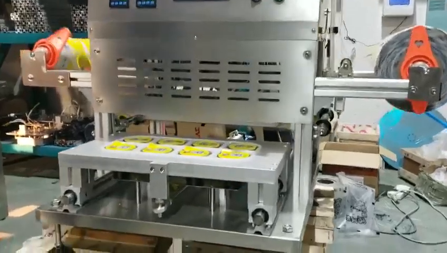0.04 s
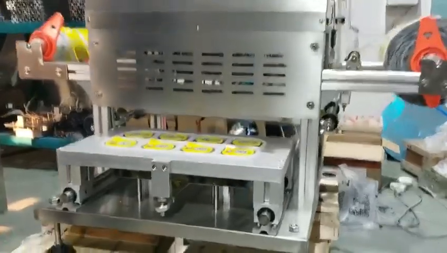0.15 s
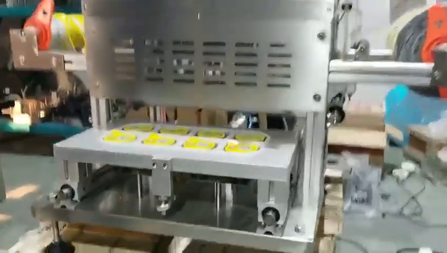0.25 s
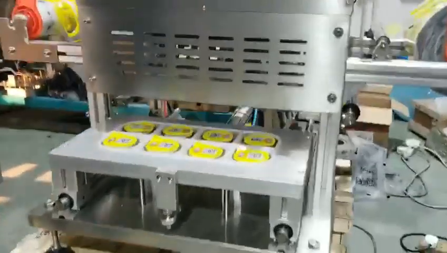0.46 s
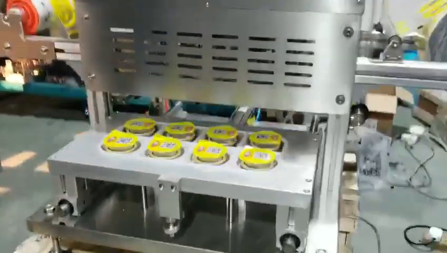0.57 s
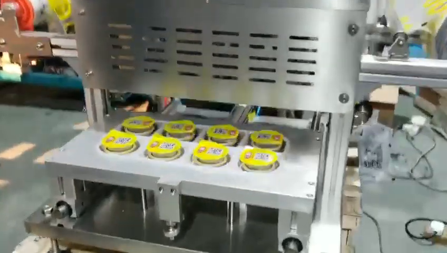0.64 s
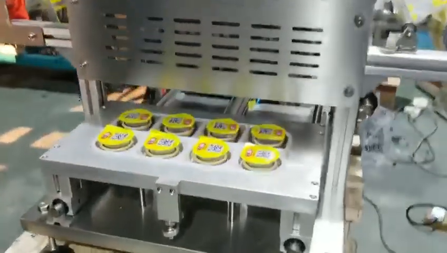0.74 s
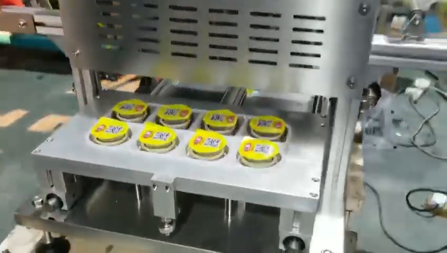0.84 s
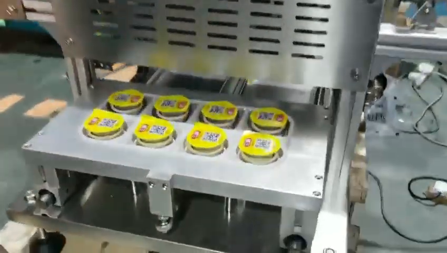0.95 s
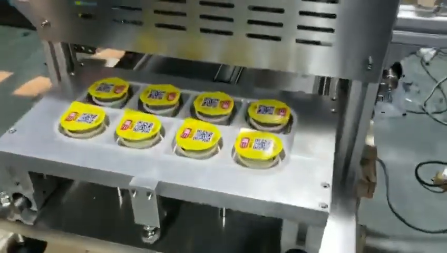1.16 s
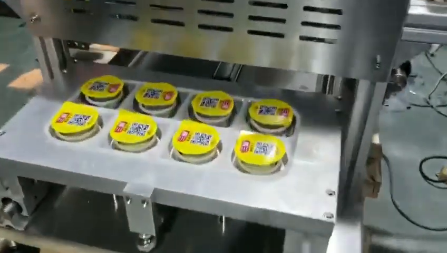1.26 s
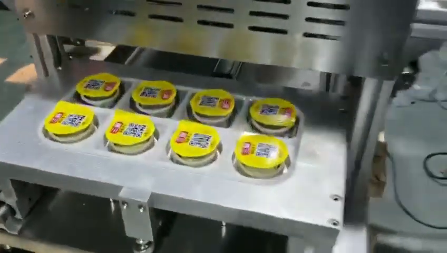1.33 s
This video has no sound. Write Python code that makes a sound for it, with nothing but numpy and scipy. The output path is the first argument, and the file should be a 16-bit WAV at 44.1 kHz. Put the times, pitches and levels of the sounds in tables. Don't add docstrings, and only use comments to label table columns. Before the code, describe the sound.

Close phone pickup of a metal machine tray: soft pneumatic thump, short rubbing slide, hard clank and rapid ringing rattle, then low frame boom, tiny ticks and faint distant machinery in a live workshop.

```python
import sys
import numpy as np
from scipy import signal
from scipy.fft import rfft, irfft, next_fast_len
from scipy.io import wavfile
from scipy.ndimage import uniform_filter1d

SR = 44100
rng = np.random.default_rng(int(sys.argv[2]) if len(sys.argv) > 2 else 0)


def store_pcm(level_fs):
    pcm = np.round(np.clip(level_fs, -1, 1) * 32767).astype(np.int16)
    wavfile.write(sys.argv[1], SR, np.atleast_2d(pcm).T)


def invert_db(x):
    u = np.asarray(x, float) / 20
    return 10 ** u


N = 61739

# pitch_hz, likeness [-1..1]
LIKENESS = [(60, 0.97), (240, 1), (940, 0.44), (3740, -0.15), (14800, -0.034)]


def evened(x):
    return x / np.sqrt(np.mean(x ** 2) + 1e-20)


def read(points, hz):
    f, value = np.transpose(points)
    return np.interp(np.log(hz + 1), np.log(f + 1), value)


def curve_db(points):
    return invert_db(np.interp(np.arange(N) / SR, *np.transpose(points)))


def add(mix, s, sound):
    part = mix[:, round(s * SR):][:, :sound.shape[1]]
    part += sound[:, :part.shape[1]]


def paired(a, b, same):
    return np.array([a, same * a + np.sqrt(1 - same ** 2) * b])


def bell(hz, centre_hz, octaves):
    return np.exp(-.5 * (np.log2(hz / centre_hz) / octaves) ** 2)


def ring(modes, rise_s, detune):
    port_gap_s, scatter_rad = .00002, 0.86
    hz, db, t60 = np.transpose(modes)[:, :, None]
    t = np.arange(min(t60.max(), .5) * SR) / SR
    pitch_u, lag_u, blow_u = rng.standard_normal((len(modes), 3)).T[:, :, None]
    lag = np.pi * hz * port_gap_s + scatter_rad * lag_u * hz / 4000
    spin = 2j * np.pi * hz * (1 + detune * pitch_u) - np.log(1000) / t60
    turn = invert_db(db + 2 * blow_u) * np.exp(spin * t + .4j * blow_u)
    ports = np.exp(1j * np.hstack([lag, -lag]).T) @ turn
    return ports.imag * (1 - np.exp(-t / rise_s))


def struck(modes, blows, rise_s, detune=0.011):
    out = np.zeros((2, N))
    for s, db in blows:
        add(out, s, invert_db(db) * ring(modes, rise_s, detune))
    return out


def cylinder():
    # pitch_hz, level_db, t60_s
    modes = [(220, -21.5, 0.073), (427, -2, .05), (464, -4.5, 0.055), (560, -7, 0.04), (950, -17.5, 0.089),
             (1016.6, -11.5, 0.14), (1210, -21.5, 0.03), (2470, -21, 0.2), (2580, -22, 0.28),
             (2692, -22, 0.4), (3144, -25, .15), (3170, -23, 0.208)]
    # start_s, level_db
    blows = [
        (0.2089, -18),
        (.2150, -25.5),
    ]
    return struck(modes, blows, rise_s=0.00029)


def cylinder_low():
    # pitch_hz, level_db, t60_s
    modes = [(108.6, 3, 0.091), (127, -10.5, 0.049)]
    # start_s, level_db
    blows = [
        (0.2098, -18),
    ]
    return struck(modes, blows, rise_s=.005)


def stop():
    # pitch_hz, level_db, t60_s
    modes = [(745, -15.5, 0.15), (904, -12, 0.042), (1588, -15, 0.082), (2200, -17, 0.065),
             (2531, 1, 0.033), (3430, -11, 0.057), (3788, -7, 0.072), (4210, -5.5, 0.043),
             (4693, -7, 0.042), (4904, -29.5, .03)]
    # start_s, level_db
    blows = [
        (.3883, -13.5),
        (.3925, -26),
        (.3970, -29.5),
    ]
    return struck(modes, blows, rise_s=0.00091, detune=0.0141)


def tray():
    # pitch_hz, level_db, t60_s
    modes = [(1790, -11, 0.01), (2000, -12, 0.015), (2196, -5, 0.016), (2650, 0, 0.016), (2894, -2, 0.011),
             (3200, -2, 0.011), (3450, -4, 0.013), (3800, -1, 0.011), (4300, -4.5, 0.009),
             (5866, -13, 0.04)]
    # start_s, level_db
    blows = [
        (0.4343, -7),
        (0.4372, -8),
    ]
    return struck(modes, blows, rise_s=.00025)


def rail():
    # pitch_hz, level_db, t60_s
    modes = [(1500, -6, .04), (1712, 0, .06), (1911, -2, .05), (2100, -4, .04), (2272, 0, .05),
             (2700, -7, .04), (3400, -4, .05)]
    # start_s, level_db
    blows = [
        (0.3158, -41.5),
        (.4770, -23.5),
        (.4830, -23.5),
        (0.494, -29),
    ]
    return struck(modes, blows, rise_s=0.003)


def latch():
    # start_s, level_db, free_flight_s
    bounces = [(.4020, -19, .012), (.4160, -16, .015), (.4375, -10, .007), (.4487, -1.5, .0045),
               (.4525, -10, .006), (.4568, -11, .004), (.4620, -12, .004), (.4665, -5, .012),
               (.4803, -8, .006), (.4895, -15, .005), (.5010, -21, .012), (.5190, -27, .008),
               (.5310, -30, .008)]
    # pitch_hz, level_db
    partials = [(4118, 0), (3890, -10), (3970, -17), (4290, -20), (11600, -29)]
    rise_s, choke_s, t60_s, choked_gain = 0.0013, 0.0015, 0.058, .05
    in_step_s = .4508
    lag_rad = 0.57
    loose_s, loose_db = .515, -6

    t, size = np.arange(SR // 3) / SR, np.zeros((1, N))
    for s, db, flight_s in bounces:
        choke = np.clip((flight_s - t) / choke_s + .5, choked_gain, 1)
        pulse = invert_db(db - 60 * t / t60_s) * (1 - np.exp(-t / rise_s)) * choke
        add(size, s, pulse[None])

    t, lags = np.arange(N) / SR, np.array([[lag_rad], [-lag_rad]])
    lines = sum(invert_db(db) * np.sin(2 * np.pi * hz * (t - in_step_s) + lags) for hz, db in partials)
    hz = np.fft.rfftfreq(N, 1 / SR) + 1
    band = bell(hz, centre_hz=4030, octaves=.055)
    fuzz = evened(irfft(rfft(rng.standard_normal((2, N))) * band, N))
    return size * np.where(t < loose_s, lines, invert_db(loose_db) * fuzz), size * fuzz[[0, 0]]


def frame():
    # pitch_hz, level_db, t60_s
    modes = [(129.1, -8, 0.32), (189, -1.5, 0.2), (221.9, -3.5, 0.29), (260.5, -2, 0.15),
             (307.8, -12.5, 0.19), (460.9, -10, 0.17), (551, -16.5, 0.35), (651.4, -11.5, 0.26),
             (700, -14, 0.33), (717.6, -17, 0.36), (1020, -17.5, 0.23)]
    # start_s, level_db
    blows = [
        (.3910, -23),
        (.4170, -26),
        (.4400, -21),
        (0.47, -24),
    ]
    return struck(modes, blows, rise_s=.004, detune=0.0052)


def boom():
    # start_s, level_db
    swell = [(.385, -55), (.396, -29), (.432, -24), (.46, -26), (.526, -27.5), (.574, -34), (.60, -39),
             (.634, -40), (.72, -56)]
    panel_hz, wobble_db = 168.5, 1.5
    wobble = uniform_filter1d(rng.standard_normal(N), size=700)
    wobble = evened(uniform_filter1d(wobble, size=700))
    return curve_db(swell) * invert_db(wobble_db * wobble) * np.sin(2 * np.pi * panel_hz * np.arange(N) / SR)


def ticks():
    # start_s, level_db, centre_hz, width_octaves, t60_s
    bursts = [(0.1228, -42, 3800, 0.46, 0.029), (.1390, -33.5, 11800, 0.13, 0.022),
              (0.144, -37, 11500, .3, 0.021), (.1410, -44.5, 4200, 0.22, 0.0176),
              (0.2, -42.5, 3250, 0.27, 0.0714), (.2025, -30, 11500, .4, 0.13),
              (0.212, -22.5, 11700, 0.72, 0.16), (.2115, -53, 3000, .7, 0.068),
              (.3120, -38.5, 2300, 1, .15), (.3165, -29.5, 4080, 0.71, .12),
              (.3153, -39.5, 11800, 0.33, 0.32), (.3886, -20.5, 11200, 0.29, 0.035),
              (.4345, -28, 11700, 0.3, .05), (0.4474, -24.5, 11270, 0.11, 0.1),
              (.4822, -23.5, 10300, 0.193, 0.034), (.4030, -43.5, 11500, .3, 0.083),
              (0.5296, -26, 7900, 0.71, 0.048), (0.642, -33, 6860, 0.2, 0.027),
              (.8411, -45.5, 12000, .4, 0.083), (0.9106, -37.5, 1730, 0.17, 0.036),
              (0.9128, -41, 3540, 0.51, 0.071), (0.9122, -38, 10200, 0.17, .02),
              (1.0301, -37, 11500, 0.84, 0.052), (1.1309, -45, 11000, 0.14, .02),
              (1.3544, -40, 8000, 0.32, 0.028), (1.254, -54.5, 700, 0.69, 0.61),
              (.001, -49.5, 58, 0.11, 4.1), (0.209, -26.5, 356, 0.42, 0.092), (0.48, -17, 2850, 0.17, 0.026),
             (0.4, -40, 430, 0.21, 0.23), (.4350, -30.5, 5900, 0.097, 0.075), (0.52, -34, 7300, 0.039, .05),
             (.4612, -28.5, 6900, 0.028, 0.052), (.3885, -26.5, 3000, 0.78, 0.028),
             (.4720, -38, 2400, 0.34, 0.18), (.225, -41, 10000, .4, 0.84), (.515, -40.5, 4020, 0.043, 0.55)]
    grit_db, rise_s, same = 3.5, 0.00018, .3
    out, t, hz = np.zeros((2, N)), np.arange(8192) / SR, np.fft.rfftfreq(8192, 1 / SR) + 1
    for s, db, centre_hz, octaves, t60 in bursts:
        grit = paired(*rng.standard_normal((2, 8192)), same)
        grit = evened(irfft(rfft(grit) * bell(hz, centre_hz, octaves)))
        grains = evened(uniform_filter1d(rng.standard_normal(8192), size=60))
        grit = grit * invert_db(grit_db * grains - 2)
        add(out, s, grit * invert_db(db - 60 * t / t60) * (1 - np.exp(-t / rise_s)))
    return out


def wash(colour, patchy_db, flicker_db):
    frames, hz = N // 128 + 6, np.fft.rfftfreq(512, 1 / SR)
    a, b, c, d, patches = rng.standard_normal((frames, 257, 5)).T
    patches = uniform_filter1d(patches, size=6, axis=0)
    patches = evened(uniform_filter1d(patches, size=14, axis=1))
    flicker = evened(uniform_filter1d(rng.standard_normal(frames), size=3))
    same = np.clip(read(LIKENESS, hz), -1, 1)[:, None]
    z = paired(a + 1j * b, c + 1j * d, same)
    z *= invert_db(read(colour, hz)[:, None] + patchy_db * patches + flicker_db * flicker)
    return evened(signal.istft(z, nperseg=512, noverlap=384)[1][:, :N])


def slide():
    # start_s, level_db
    rub = [(.19, -67), (.215, -31), (.27, -37.5), (.32, -37.5), (.38, -38.5), (.40, -32.5), (.48, -26),
           (.56, -40.5), (.85, -59)]
    # pitch_hz, level_db per Hz
    colour = [(40, -12.5), (100, 7), (450, -2), (1300, -9.5), (2550, -6.5), (4300, -7), (6000, -32),
              (15000, -22)]
    return curve_db(rub) * wash(colour, patchy_db=3.0, flicker_db=2.5)


def room(x):
    # pitch_hz, t60_s
    decay = [(150, 0.62), (600, 0.82), (2000, 0.326), (4000, 0.82), (10000, 0.74)]
    taps = np.zeros((2, SR))
    at = np.arange(300, SR - 20, 20) + rng.integers(0, 20, (2, (SR - 301) // 20))
    np.put_along_axis(taps, at, rng.choice([-1., 1.], at.shape), 1)
    hz, t, z = signal.stft(taps, SR, nperseg=256)
    z = paired(z[0], z[1], np.clip(read(LIKENESS, hz), -1, 1)[:, None])
    fade = invert_db(-60 * t / read(decay, hz)[:, None])
    tail = signal.istft(z * fade, SR, nperseg=256)[1]
    return signal.fftconvolve(x.mean(0)[None], tail / np.linalg.norm(tail[0]), axes=1)[:, :N]


def shop():
    # pitch_hz, level_db per Hz
    colour = [(25, -30), (60, 2.5), (190, -4), (400, -7), (800, -10.5), (1300, -15.5), (4300, -16),
              (15000, -16.5)]
    # start_s, level_db
    loudness = [(0, -42.5), (.2, -43), (.8, -47.5), (1.4, -46.5)]
    # pitch_hz, level_db
    hum = [(60, -60.5), (100, -62.5), (181, -63.5), (203, -56.5), (304, -63), (403, -65)]
    t, lines = np.arange(N) / SR, np.zeros(N)
    for hz, db in hum:
        waver = evened(uniform_filter1d(rng.standard_normal(N), size=2500))
        lines += invert_db(db + 3 * waver) * np.sin(2 * np.pi * (hz * t + rng.random()))
    return curve_db(loudness) * wash(colour, patchy_db=2.0, flicker_db=0.6) + lines


def scene():
    blows = cylinder() + cylinder_low() + stop() + tray() + rail() + ticks()
    chatter, fuzz = latch()
    shaken = frame()
    wet = room(invert_db(-7.5) * blows + invert_db(-25.5) * fuzz + invert_db(-5.5) * shaken)
    return blows + shaken + boom() + chatter + wet + slide() + shop()


def band_limit(x):
    return signal.sosfilt(signal.butter(12, 15450, fs=SR, output="sos"), x)


def record(dry):
    # pitch_hz, level_db
    mic = [(30, -12.5), (70, -2), (4600, 1.5), (5500, -5.5), (8300, -12.5), (10000, -6.5), (13500, -8),
           (15400, -15)]
    # pitch_hz, left_minus_right_db
    lean = [(300, 0), (700, 0), (4000, 1.5), (13000, -5)]
    size = next_fast_len(N)
    hz = np.fft.rfftfreq(size, 1 / SR)
    ports_db = read(mic, hz) + np.array([[.5], [-.5]]) * read(lean, hz)
    heard = irfft(rfft(dry, size) * invert_db(ports_db), size)[:, :N]
    return band_limit(np.clip(heard, -1, 1))


dry = scene()
out = record(dry)
store_pcm(out)
```